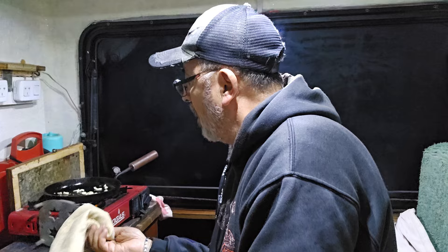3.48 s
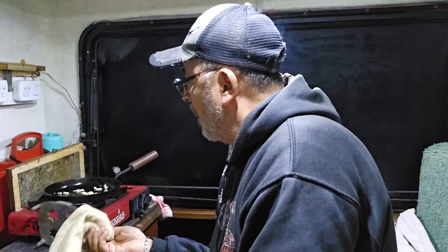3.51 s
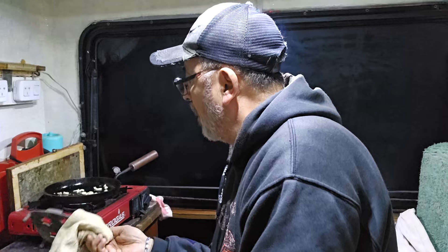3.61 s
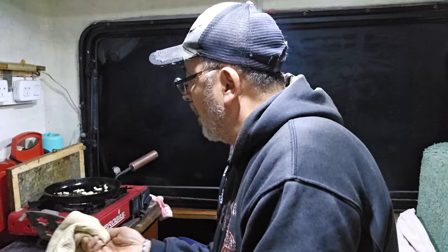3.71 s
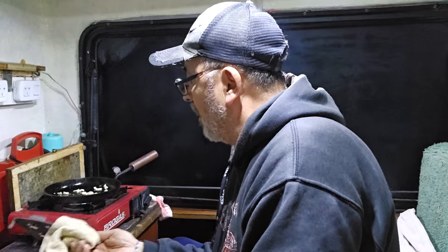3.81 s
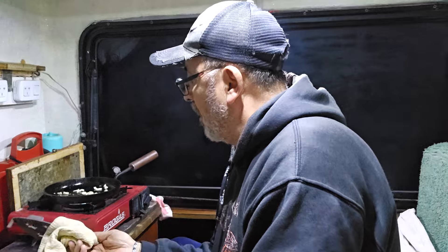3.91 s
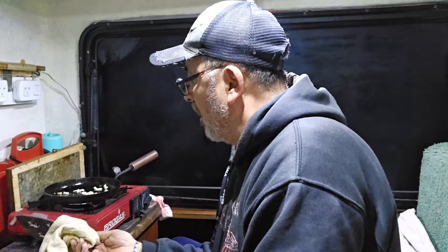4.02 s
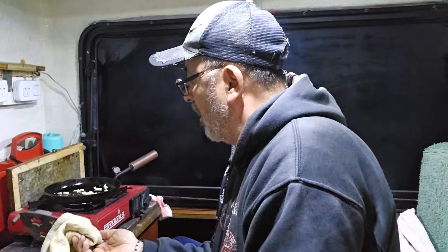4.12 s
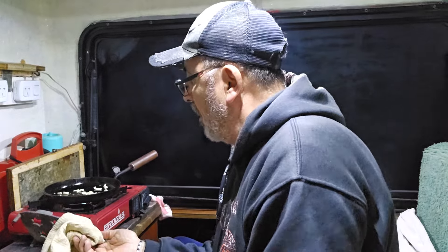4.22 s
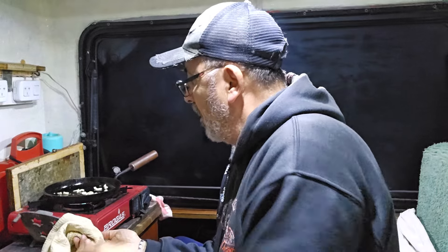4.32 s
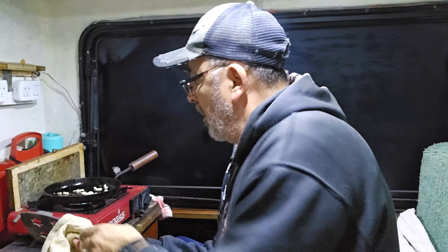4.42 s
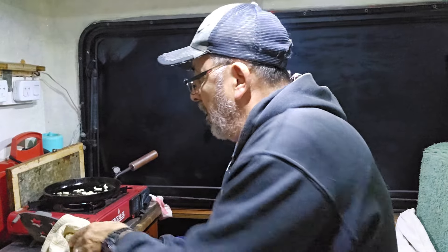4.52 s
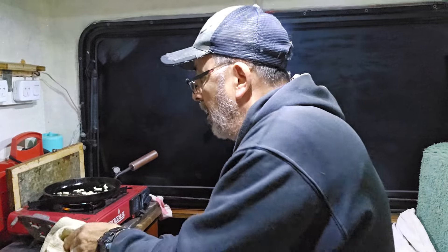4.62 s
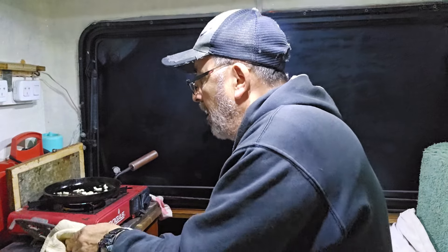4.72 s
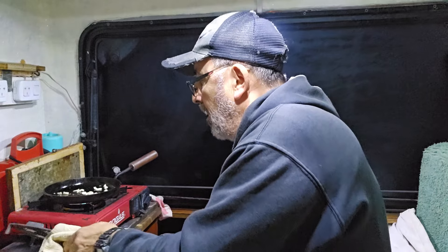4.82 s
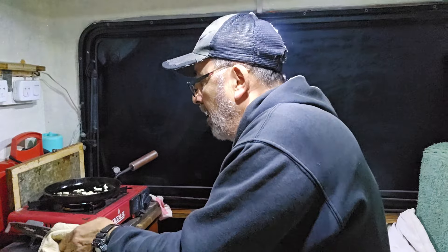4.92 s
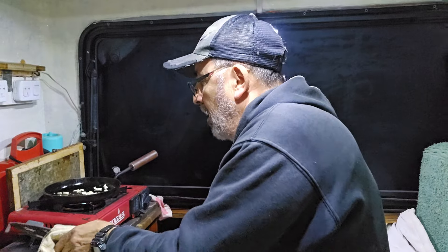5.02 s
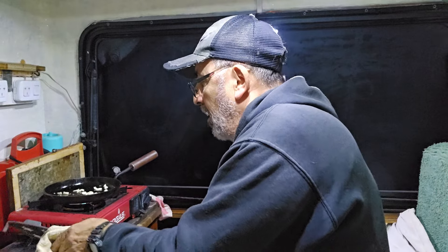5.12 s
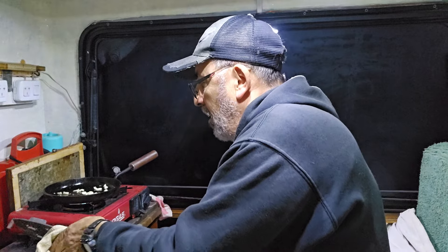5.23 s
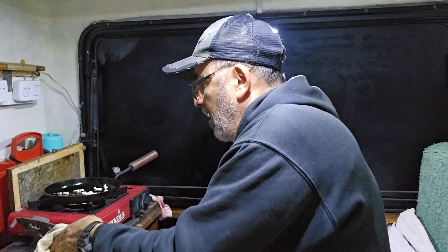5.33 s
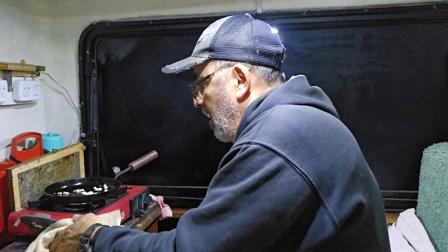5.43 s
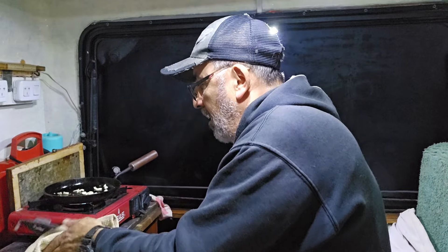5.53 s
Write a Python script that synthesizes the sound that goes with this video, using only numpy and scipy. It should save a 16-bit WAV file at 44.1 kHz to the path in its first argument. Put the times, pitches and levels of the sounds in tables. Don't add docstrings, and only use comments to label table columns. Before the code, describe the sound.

Sheet-metal stove fan knocks and rattles on a bench in a small cabin, over faint oil sizzle and a very low rumble.

```python
import sys
import numpy as np
from scipy import signal
from scipy.fft import rfft, irfft
from scipy.io import wavfile
from scipy.ndimage import uniform_filter1d

SR = 44100
rng = np.random.default_rng(int(sys.argv[2]) if len(sys.argv) > 2 else 0)


def waveform_to_disk(signal):
    frames = np.transpose(np.atleast_2d(signal))
    scaled = np.clip(frames, -1, 1) * 32767
    samples = np.round(scaled).astype(np.int16)
    wavfile.write(sys.argv[1], SR, samples)


def boost_factor(decibels):
    exponent = np.asarray(decibels, float) / 20
    return 10 ** exponent


N = 245328

# f/Hz, level/dB [per Hz]
RUMBLE_COLOUR = [(8.8, -36.5), (15, -2.5), (52, 0), (82, -2.5), (107, -14.5), (124, -5.5), (176, -17),
                 (204, -15), (270, -11.5), (304, -21.5), (500, -39), (650, -36), (1100, -120)]
# peak t/s, level/dB [over the drone]
SWELLS = [
    (0.48, 4.5),
    (2.42, 6),
    (3.081, 6),
    (3.76, 6),
    (4.1, 5.5),
    (5.58, 8),
]
RUMBLE_DB, SWELL_RISE_S, SWELL_FALL_S = -59, 0.21, 0.29

# f/Hz, level/dB [per Hz]
SIZZLE_COLOUR = [(210, 5), (350, -8), (529, 3.5), (611, -10), (853, 0), (1330, -7), (1920, -3.5),
                 (2180, -8), (4540, -6), (5850, -8.5), (10200, -10), (12000, -6.5), (15700, -10)]
# t/s, level/dB
SIZZLE_LEVEL = [(0.0, -76), (0.9, -75.5), (1.22, -73.5), (1.5, -76), (2.1, -75.5), (2.6, -75.5),
                (2.9, -72.5), (3.3, -75.5), (5.2, -74.5), (5.56, -69.5)]
# f/Hz, width/Hz, level/dB [re sizzle], wander/dB
PAN_RING = [(4650, 220, -23, 3), (1800, 150, -33, 2), (11700, 1100, -19, 2.5), (14500, 400, -25, 1),
            (6300, 250, -30, 3)]

# f/Hz, level/dB, t60/s
BENCH_MODES = [(51.3, -3.5, 0.12), (70.9, 1, 0.36), (81.85, 1, 0.39), (101.6, -1.5, 0.36),
               (128.5, -2, 0.23), (166, 4, 0.28), (204.3, 10, 0.076), (262, 1, 0.25), (320, -2, 0.15)]
# t/s, peak level/dB, upper mode level/dB [re peak]
THUDS = [(0.001, -37.5, -17), (0.278, -38.5, -21), (0.346, -41, -27), (0.411, -48.5, -34),
         (0.537, -35.5, -5.5), (0.743, -49, 1.5), (0.812, -50.5, 1.5), (1.742, -39.5, -12),
         (2.232, -38, -7.5), (2.351, -38, -10), (2.799, -50, -9), (2.88, -46, -13), (3.02, -39, -8.5),
         (3.557, -30.5, -19), (3.662, -48.5, 0.5), (3.89, -37.5, -3.5), (3.93, -32.5, -17),
         (4.243, -48, -18), (4.456, -48, -18), (5.345, -39.5, -10), (5.392, -38.5, -39), (5.504, -32, -4)]
THUD_S = 0.019

# t/s, f/Hz, level/dB, t60/s
SINGLE_RINGS = [(.003, 2900, -58.5, 0.33), (.276, 1640, -53.5, 0.16), (.273, 1110, -52.5, 0.071),
                (.538, 890, -44, 0.091), (.755, 5100, -30.5, 0.065), (.792, 3700, -42, .064),
                (.791, 5260, -33, 0.04), (1.385, 2320, -60, 0.092), (1.384, 4020, -63, .09),
                (2.235, 4380, -57, 0.43), (2.46, 980, -67, 0.44), (2.863, 1056, -49, 0.061),
                (2.863, 2130, -52.5, .08), (2.915, 2120, -47.5, 0.09), (2.92, 1075, -49, 0.072),
                (2.97, 1040, -58, .087), (3.889, 2283, -31.5, 0.056), (3.95, 980, -66, 1),
                (3.951, 1840, -75, .68), (3.497, 1080, -61, 0.088), (3.95, 1440, -65, 0.55),
                (4.243, 1000, -57, 0.092), (5.342, 760, -55, .11), (5.44, 785, -61.5, .63),
                (5.504, 3650, -43, .06), (5.502, 1220, -40, .12)]
# f/Hz, level/dB, t60/s
FOOT_MODES = [(475, -0.5, 0.18), (2220, -1, 0.1)]
# f/Hz, level/dB, t60/s
FRAME_MODES = [(535, 0, 0.11), (1066, -8, 0.2), (1252, -9, 0.11), (1855, -9, 0.11), (2154, -5, 0.12),
               (2320, 2, 0.17)]
# f/Hz, level/dB, t60/s
BLADE_MODES = [(657, -12, 0.6), (1152, -9, 0.42), (3060, 0, 0.26), (4330, -10, 0.47)]
# t/s, level/dB [modes under 1.5 kHz], level/dB [modes above]
FOOT_HITS = [
    (1.112, -54, -78),
    (1.741, -45.5, -46),
    (2.356, -46.5, -42.5),
    (2.44, -50, -72),
    (2.801, -54, -75),
]
# t/s, level/dB [modes under 1.5 kHz], level/dB [modes above]
FRAME_HITS = [
    (2.232, -37, -42),
    (3.018, -39.5, -39),
    (3.563, -31, -31.5),
]
# t/s, level/dB [modes under 1.5 kHz], level/dB [modes above]
BLADE_HITS = [
    (3.6, -43, -41.5),
]

# t/s, peak level/dB, body level/dB [0.4-1 kHz re peak],
# hardness/dB [3.5-7 kHz re peak], rattle length/s
KNOCKS = [(0.0014, -43.5, -13, -6.5, 0.0073), (0.2687, -48.5, -10, -14.5, 0.022),
          (0.34, -50, -11, -8.5, 0.014), (0.5347, -34.5, -1.5, -11, 0.0068), (0.7528, -43, -3, 5, 0.0086),
          (0.7932, -43, -1, 1.5, 0.0047), (1.738, -44, 0, -15, 0.014), (2.2275, -30.5, -4.5, -5, 0.014),
          (2.3472, -44.5, -3, -12, 0.024), (2.86, -46, -5.5, 2, 0.0069), (2.9194, -53, 1.5, -4, 0.008),
          (3.0138, -32, -7, -4.5, 0.012), (3.556, -27, -7.5, -3, 0.017), (3.6535, -43, -11.5, -8, 0.014),
          (3.7553, -52, -1, -13, 0.011), (3.8886, -31.5, -4.5, -3.5, 0.0046),
          (3.9285, -40.5, -8, -8.5, 0.0098), (4.2406, -53.5, 1, -16, 0.007),
          (4.4545, -52, 0.5, -16, 0.0098), (4.614, -80.5, -10, 20, 0.0054), (5.3404, -43.5, -1, -7, 0.006),
          (5.5006, -32.5, -5.5, -4.5, 0.01)]
# t/s, peak level/dB, hardness/dB
TAPS = [
    (1.104, -60.5, -21),
    (1.387, -59, 0.5),
    (1.871, -66.5, 0),
    (2.431, -53, -17.5),
    (2.564, -64, -6),
    (2.898, -60, -10),
    (3.498, -60.5, -2),
    (4.013, -62.5, -15),
    (5.0518, -65, -17.5),
]
# t/s, peak level/dB, hardness/dB, length/s
RUBS = [
    (1.29, -77, 8, 0.066),
    (2.651, -68, -17, 0.033),
    (2.762, -60, -3.5, 0.082),
    (2.877, -62, 5.5, 0.072),
    (2.952, -79, 10, 0.026),
    (3.248, -86.5, 15, 0.038),
    (3.582, -46.5, -7, 0.042),
]
TAP_BODY_DB, TAP_BODY_SLOPE, TAP_S, TAP_S_PER_DB = -8, -0.55, 0.009, -0.0004
RUB_BODY_DB = -5
EDGE_DB, EDGE_SLOPE = 2.5, 1.55
LEAD_S = 0.016
# f/Hz, level/dB [per Hz]
CLATTER_COLOUR = [(150, -79), (250, -5), (359, -15), (525, 5.5), (669, -2), (1080, -7.5), (1990, -14.5),
                  (2360, -10.5), (2850, -19), (3700, -16), (4030, -22), (7900, -21), (9890, -19),
                  (15500, -12)]
FORCE_BANDS = [600, 1900, 5000, 10500]
# f/Hz, level/dB, t60/s
SHEET_MODES = [(466, -2, .14), (652, -8, .12), (850, -10, .12), (1066, -8, .12), (1255, -10, .1),
               (1860, -8, .12), (2154, -8, .1), (2320, -7, .12)]

# f/Hz, t60/s
ROOM_T60 = [(300, 0.22), (1000, 0.2), (3000, 0.12), (8000, 0.1), (16000, 0.083)]
# f/Hz, left minus right level/dB
LEFT_SHADE = [(100, 0), (300, 3), (600, .5), (1200, 1), (2500, 1.5), (5000, -.5), (9000, -2.5), (17000, -5)]
LEFT_LAG, EARLY = 10, 400
# f/Hz, level/dB
TOP_CUT = [(15800, 0), (15950, -22), (16500, -30), (16700, -90)]


def unit(x):
    return x / np.sqrt(np.mean(x ** 2))


def curve(table):
    return boost_factor(np.interp(np.arange(N) / SR, *np.transpose(table)))


def colour(x, table):
    hz, db = np.transpose(table)
    bins = np.maximum(np.fft.rfftfreq(x.shape[-1], 1 / SR), 1)
    gain = boost_factor(np.interp(np.log(bins), np.log(hz), db))
    return irfft(rfft(x) * gain, x.shape[-1])


def band(x, lo_hz, hi_hz):
    return signal.sosfilt(signal.butter(2, [lo_hz, hi_hz], "band", fs=SR, output="sos"), x)


def split(x, centres_hz):
    bins = np.log(np.maximum(np.fft.rfftfreq(x.shape[-1], 1 / SR), 1))
    shares = (np.interp(bins, np.log(centres_hz), peak) for peak in np.eye(len(centres_hz)))
    spectrum = rfft(x)
    return [irfft(spectrum * np.sin(np.pi / 2 * share) ** 2, x.shape[-1]) for share in shares]


def walk(rate):
    hold = int(SR / rate)
    steps = np.repeat(rng.standard_normal(N // hold + 1), hold)
    smooth = uniform_filter1d(uniform_filter1d(steps, hold), hold)
    return unit(smooth[:N])


def add(track, s, piece):
    start = int(s * SR)
    track[..., start:start + piece.shape[-1]] += piece[..., :N - start]


def touch(length, sharp):
    t = np.arange(int(3 * length * SR)) / SR / length
    if sharp:
        return np.minimum(t / 0.28, 1) ** 2 * np.exp(-t ** 3)
    return np.sin(np.pi * np.minimum(t, 1)) ** 2


def ring(drive, modes):
    out = 0
    for x, (hz, db, t60) in zip(drive, modes):
        pole = np.exp(2j * np.pi * hz / SR - np.log(1000) / (t60 * SR))
        out = out + boost_factor(db) * signal.lfilter([1], [1, -pole], x).imag
    return out


def rumble():
    mid, side = colour(rng.standard_normal((2, N)), RUMBLE_COLOUR)
    drone = unit(mid + 0.23 * side * np.array([[1], [-1]]))
    t = np.arange(N) / SR
    swell_db = sum(np.interp(t, [s - SWELL_RISE_S, s, s + SWELL_FALL_S], [0, db, 0]) for s, db in SWELLS)
    return drone * boost_factor(RUMBLE_DB + swell_db + 2 + 0.61 * walk(9.1))


def sizzle():
    burst_size = boost_factor(2.0 * np.minimum(rng.exponential(size=(2, N)), 6))
    bursts = rng.standard_normal((2, N)) * burst_size
    hiss = unit(colour(bursts, SIZZLE_COLOUR))
    patches = sum(part * boost_factor(0.31 * walk(27)) for part in split(hiss, 500 * 2. ** np.arange(6)))
    for hz, width, db, wander_db in PAN_RING:
        resonance = unit(band(bursts, hz - width / 2, hz + width / 2))
        patches = patches + resonance * boost_factor(db + wander_db * walk(8.7))
    return patches * curve(SIZZLE_LEVEL) * boost_factor(9.0 + np.array([[-.8], [.8]]))


def bench():
    push = np.zeros((len(BENCH_MODES), N))
    upper = np.array(BENCH_MODES)[:, :1] > 140
    shape = touch(THUD_S, True)
    for s, db, upper_db in THUDS:
        shake = rng.standard_normal((len(BENCH_MODES), len(shape))) * shape
        add(push, s, shake * boost_factor(db + upper_db * upper))
    boom = boost_factor(-31.5) * band(ring(push, BENCH_MODES), 31, 630)
    return np.array([np.roll(boom, 2 * LEFT_LAG), boom])


def panels():
    rings = list(SINGLE_RINGS)
    for modes, hits in ((FOOT_MODES, FOOT_HITS), (FRAME_MODES, FRAME_HITS), (BLADE_MODES, BLADE_HITS)):
        for s, low_db, high_db in hits:
            for hz, db, t60 in modes:
                rings.append((s, hz, db + (low_db if hz < 1500 else high_db), t60))
    out = np.zeros(N)
    t = np.arange(SR // 2) / SR
    for s, hz, db, t60 in rings:
        pair = np.sin(2 * np.pi * hz * t) + 0.3 * np.sin(2 * np.pi * 1.011 * hz * t)
        decay = boost_factor(db - 60 * t / t60)
        add(out, s, decay * np.minimum(t / 0.0029, 1) * pair)
    return np.array([np.roll(out, LEFT_LAG // 3), out])


def fan_metal():
    taps = [(s, db, TAP_BODY_DB + TAP_BODY_SLOPE * hard, hard, TAP_S + TAP_S_PER_DB * hard)
            for s, db, hard in TAPS]
    rubs = [(s, db, RUB_BODY_DB, hard, length) for s, db, hard, length in RUBS]
    force = np.zeros((4, N))
    for touches, sharp in ((KNOCKS + taps, True), (rubs, False)):
        for s, db, body, hard, length in touches:
            edge = EDGE_DB + EDGE_SLOPE * hard
            band_db = np.array([[body], [0], [hard], [edge]])
            add(force, s, boost_factor(db + band_db) * touch(length, sharp))
    approach = np.linspace(0, 1, int(LEAD_S * SR))
    for s, db, body, *_ in KNOCKS[1:] + taps:
        add(force[:2], s - LEAD_S, boost_factor(db - 28 + np.array([[body], [0]])) * approach)
    impacts = rng.standard_normal(N) * boost_factor(2.54 * rng.exponential(size=N))
    parts = np.array(split(colour(impacts, CLATTER_COLOUR), FORCE_BANDS))
    parts /= np.sqrt(uniform_filter1d(parts ** 2, size=500, axis=1))
    clatter = np.sum(parts * force * boost_factor(np.array([[-2], [-3], [-3], [-2]])), axis=0)
    drive = [force[int(hz > 900)] * rng.standard_normal(N) for hz, _, _ in SHEET_MODES]
    return clatter + boost_factor(-34) * ring(drive, SHEET_MODES)


def cabin(x):
    t = np.arange(int(.4 * SR)) / SR
    hz, t60 = np.transpose(ROOM_T60)
    mid, side = (split(v, hz) for v in rng.standard_normal((2, len(t))))
    tail = 0
    for k in range(len(hz)):
        width = min(hz[k] / 1000, 1)
        tail = tail + (mid[k] + width * side[k] * np.array([[1], [-1]])) * boost_factor(-60 * t / t60[k])
    tail = tail * np.minimum(t / 0.0014, 1) * boost_factor(-27)
    tail[0, LEFT_LAG] += 1
    tail[1, 0] += 1
    response = rfft(np.roll(tail, EARLY, axis=1))
    response /= np.sqrt(uniform_filter1d(np.abs(response) ** 2, size=70, axis=1))
    echo = boost_factor(3.0) * irfft(response, len(t))
    left, right = signal.fftconvolve(x[None], echo, axes=1)[:, EARLY:N + EARLY]
    return np.array([colour(left, LEFT_SHADE), right])


def scene():
    return rumble() + sizzle() + bench() + panels() + cabin(fan_metal())


def top_cut(x):
    return signal.sosfilt(signal.butter(12, 16690, fs=SR, output="sos"), x)


def record(dry):
    mix = colour(dry, TOP_CUT)
    return top_cut(mix)


dry = scene()
out = record(dry)
waveform_to_disk(out)
```